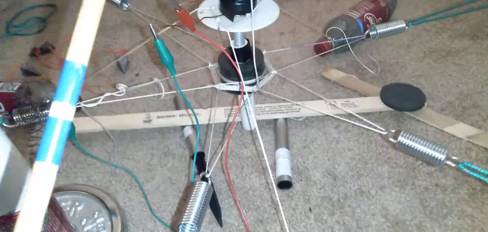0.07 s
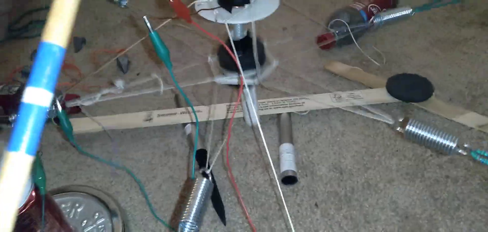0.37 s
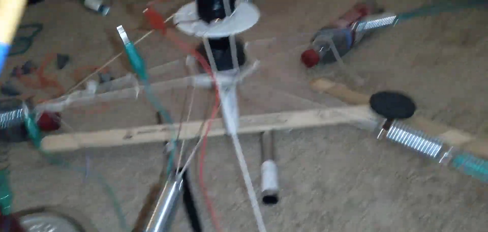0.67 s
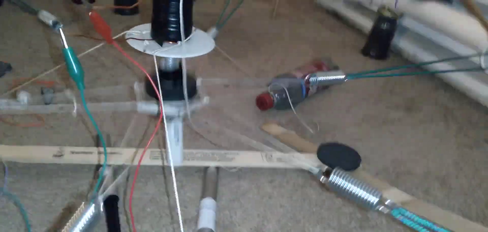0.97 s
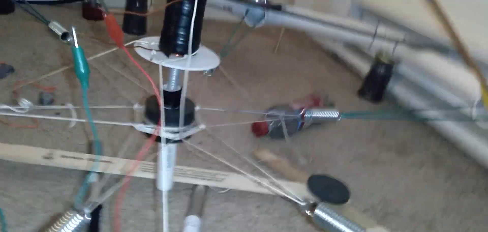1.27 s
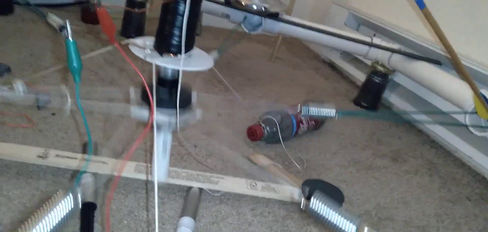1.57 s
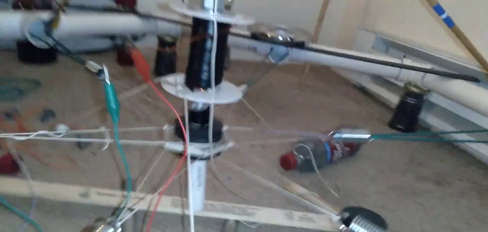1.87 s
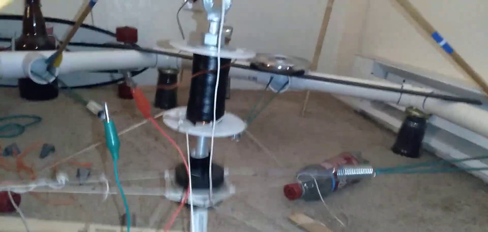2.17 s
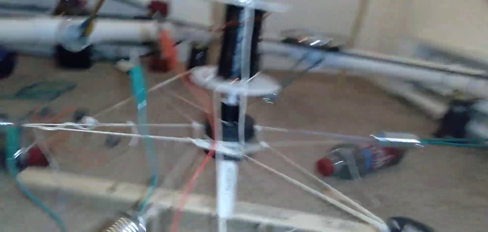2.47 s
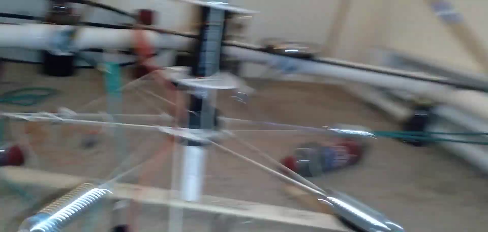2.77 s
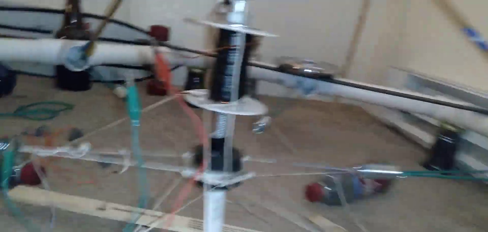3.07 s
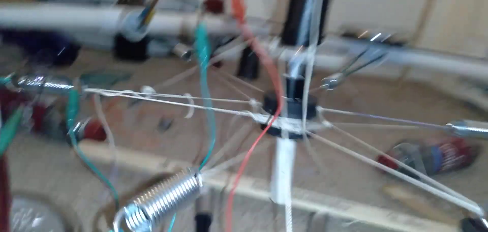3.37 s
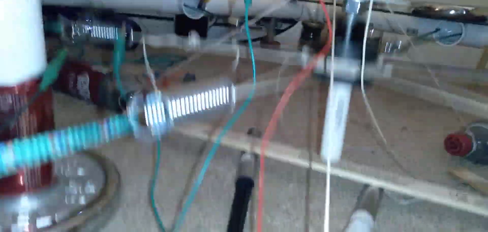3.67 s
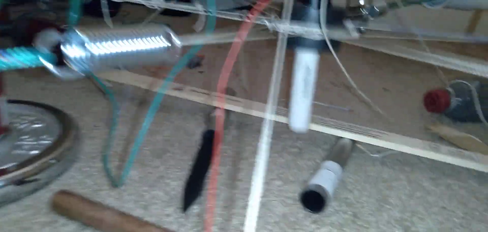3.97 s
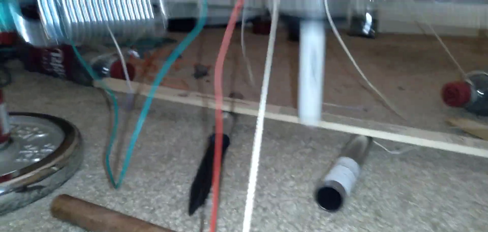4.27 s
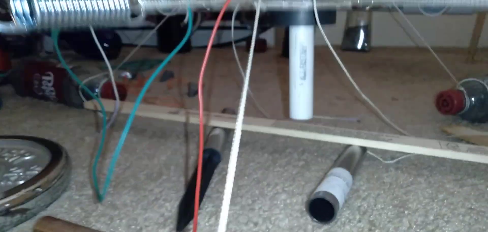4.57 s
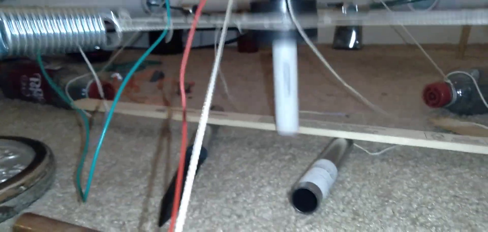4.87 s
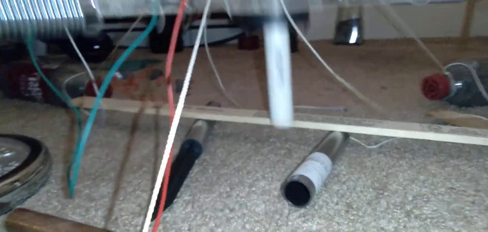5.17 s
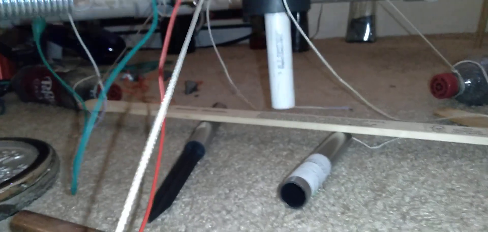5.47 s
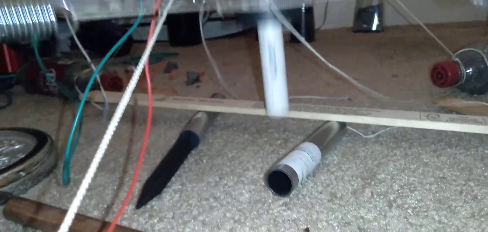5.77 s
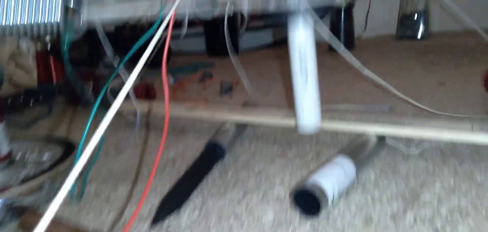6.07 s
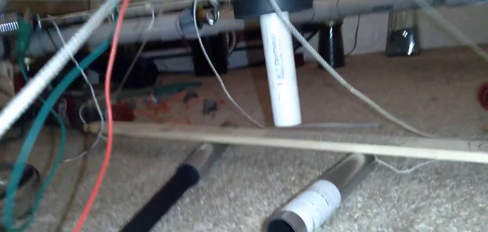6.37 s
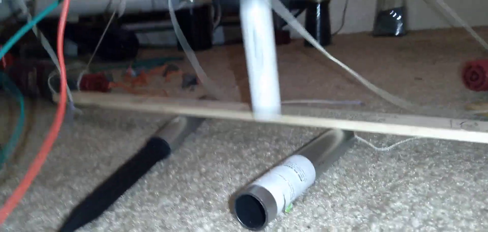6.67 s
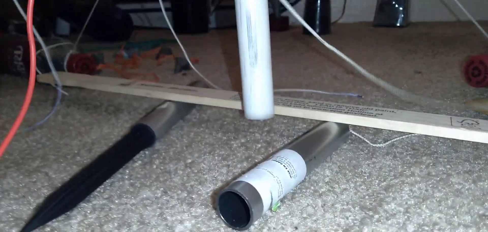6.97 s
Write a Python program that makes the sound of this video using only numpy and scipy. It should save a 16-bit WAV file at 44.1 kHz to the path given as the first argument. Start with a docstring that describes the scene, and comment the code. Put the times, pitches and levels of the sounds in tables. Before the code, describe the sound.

Fast, even metallic rattling of jerked coil springs on a spinning contraption, with wooden clatter, sharp clicks and a faint string twang.

```python
"""After a short silence, a homemade machine starts turning 5.6 times a second on a small room's carpet.
Strings and steel coil springs hold its shaft. Each turn jerks the springs: their coils clash in four
quick bursts while the frame clatters, loose parts knock and a string twangs. In the first four seconds
the strings rub hardest on the shaft and hooks slap the springs loudly. Then the springs sound duller
and the twang stands out, until the loud slaps return near the end."""
import sys
import numpy as np
from scipy import signal
from scipy.fft import rfft, irfft, next_fast_len
from scipy.io import wavfile

SR = 44100
rng = np.random.default_rng(int(sys.argv[2]) if len(sys.argv) > 2 else 0)


def materialize(psi):
    """Save the field psi as 16-bit PCM at rate SR to the path in sys.argv[1].

    A 1-D psi becomes a single channel; in a 2-D psi each row is a channel.
    """
    bounded = np.clip(np.atleast_2d(psi).T, -1, 1)
    quanta = np.round(bounded * 32767).astype(np.int16)
    wavfile.write(sys.argv[1], SR, quanta)


N = 313551
SIZE = 16384  # samples in one short sound; T holds its times and HZ its frequencies
T = np.arange(SIZE) / SR
HZ = np.fft.rfftfreq(SIZE, 1 / SR)
SCENE_T = np.arange(N) / SR


def amp(db):
    """Turn decibels into a gain."""
    return 10 ** (np.asarray(db) / 20)


def unit(x):
    """Scale x to an average power of 1."""
    return x / np.sqrt(np.mean(np.abs(x) ** 2) + 1e-20)


def along(points, hz):
    """Read between (frequency, value) points on an octave scale."""
    freqs, values = np.transpose(points)
    return np.interp(np.log(hz + 1), np.log(freqs), values)


def hump(centre_hz, octaves):
    """A smooth hill of height 1 around one frequency."""
    return np.exp(-.5 * (np.log2((HZ + 1) / centre_hz) / octaves) ** 2)


def add(track, start_s, x):
    """Mix a short sound into the track."""
    i = max(round(start_s * SR), 0)
    track[..., i:i + SIZE] += x[..., :max(N - i, 0)]


def filtered(x, response):
    """Scale each frequency of x by response(hz)."""
    size = next_fast_len(N + SIZE, real=True)
    return irfft(rfft(x, size) * response(np.fft.rfftfreq(size, 1 / SR)), size)[..., :N]


def struck(colour):
    """The response of a struck object with this tone colour: nothing sounds before the blow."""
    cepstrum = irfft(np.log(np.maximum(colour, 1e-6)))
    cepstrum[1:SIZE // 2] *= 2
    cepstrum[SIZE // 2 + 1:] = 0
    return np.exp(rfft(cepstrum))


def wobble(rate):
    """A wandering curve through `rate` random points a second."""
    points = rng.standard_normal(int(N * rate / SR) + 4)
    return np.interp(SCENE_T * rate, np.arange(len(points)), points)


def noise(spectrum, width):
    """Stereo noise with the given tone colour."""
    middle, side = filtered(rng.standard_normal((2, N)), lambda hz: amp(along(spectrum, hz)))
    return unit(np.array([middle + width * side, middle - width * side]))


def taps(delay_s, length_s, scatter_db, count, fade_db=0):
    """A burst of tiny, uneven hits that fades by fade_db along its length."""
    when = length_s * (np.arange(count) + rng.random(count)) / count
    attack = np.minimum(.5 + when / .002, 1)
    sizes = attack * amp(scatter_db * rng.standard_normal(count) - fade_db * when / length_s)
    sizes *= rng.choice([-1, 1], count)
    samples = ((max(delay_s, 0) + when) * SR).astype(int)
    return np.bincount(samples, sizes / np.linalg.norm(sizes), SIZE)[:SIZE]


# How long the room's echo takes to fall 60 dB at fade_speed 1: frequency_hz, fade_s
ROOM_FADE = [(100, 0.93), (600, 0.24), (3000, 0.24), (8000, 0.19), (15000, 0.1)]

def room(wet_db, fade_speed=1, lag_s=.000355, shared_hz=900):
    """Sound reaches the right ear first, then the left, and the walls answer."""
    hz = np.fft.rfftfreq(256, 1 / SR)[:, None]
    t = np.arange(SIZE // 128 + 1) * 128 / SR
    grains = rng.standard_normal((2, len(hz), len(t), 2)) @ [1, 1j]
    fade = amp(-60 * fade_speed * t / along(ROOM_FADE, hz))
    echo = signal.istft(grains * fade)[1] * (1 - np.exp(-T / .00027))
    middle, side = unit(rfft(echo))
    spread = np.pi / 4 * (1 - np.exp(-HZ / shared_hz))  # low notes are alike in both ears
    walls = np.cos(spread) * middle + np.sin(spread) * np.array([side, -side])
    lag = lag_s * (1 + rng.normal(0, .07))  # each blow comes from a slightly different direction
    direct = np.exp(-2j * np.pi * HZ * np.array([[lag], [0]]))
    return (direct + amp(wet_db) * walls) / np.hypot(1, amp(wet_db))


def spin_up(start_s=.382):
    """The running noises rise from silence as the machine gets going."""
    return np.interp(SCENE_T, [start_s, .55, .62], [.1, .2, 1]) * np.clip((SCENE_T - start_s) / .0047, 0, 1)


LEAN_LEFT = amp([[1.3], [-1.3]])
# Tone colour of the frame's rumble: frequency_hz, level_db
RUMBLE_TONE = [(20, -29), (50, -13), (72, -1.5), (105, -4), (150, 4), (200, -8), (270, -1), (420, -8),
               (900, -27.5), (4000, -64)]

def rumble(level_db=-69):
    """The frame rumbles, swelling once with each turn of the shaft."""
    starts = np.array(SHAFT_TURNS)[:, 0]
    edges = np.append(starts, 2 * starts[-1] - starts[-2])
    angle = 2 * np.pi * np.interp(SCENE_T, edges, np.arange(len(edges)))
    swell = amp(level_db - 3.5 * np.cos(angle + .029) + 3.8 * wobble(25))
    return spin_up() * swell * noise(RUMBLE_TONE, width=.45) * LEAN_LEFT


# Tone colours of the strings' scrape and hiss: frequency_hz, level_db
SCRAPE_TONE = [(30, -21), (110, -8), (170, 0), (225, 7), (320, -16), (600, 2.5), (1000, 5), (1500, 6),
               (2200, 8), (3500, 4), (6000, -8.5), (16000, -11.5)]
HISS_TONE = [(1500, -48), (4500, 0), (6500, 0.5), (8200, 8.5), (10000, 5), (12000, 0), (15500, -4.5)]
# Spells when the strings grip the shaft: peak_s, rise_s, fall_s, scrape_db, hiss_db
GRIPS = [(0.79, 0.35, 0.23, -51.5, -47), (1.02, 0.6, .7, -70, -51), (1.89, 0.086, 0.17, -54, -48),
         (2.06, 0.12, 0.098, -77, -42), (2.64, 0.32, 0.71, -52.5, -49.5), (2.9, 0.71, 1.83, -61, -48)]

def rubbing(light_scrape_db=-74.5, light_hiss_db=-65.5, swell_db=21):
    """The strings rub lightly on the shaft, and harder in spells that swell and fade."""
    scrape_gain, hiss_gain = amp(light_scrape_db), amp(light_hiss_db)
    for peak_s, rise_s, fall_s, scrape_db, hiss_db in GRIPS:
        spell = amp(-swell_db * np.maximum((peak_s - SCENE_T) / rise_s, (SCENE_T - peak_s) / fall_s))
        scrape_gain = np.hypot(scrape_gain, amp(scrape_db) * spell)
        hiss_gain = np.hypot(hiss_gain, amp(hiss_db) * spell)
    scrape = scrape_gain * amp(1 + 3 * wobble(150)) * noise(SCRAPE_TONE, width=.88)
    hiss = hiss_gain * amp(wobble(60)) * noise(HISS_TONE, width=1)
    return spin_up() * (scrape + hiss * LEAN_LEFT)


# The twanging string is nearer, and so louder, later on: time_s, level_db
TWANG_LEVELS = [(1.5, -66), (3.6, -62.5), (4.5, -57), (7, -62)]

def twang(pitch_hz=313, peak_s=.052, sharpness=3.5, sag_hz_per_s=160):
    """A tight string swells and dies once a turn; its pitch flutters and sags as the pull lets go."""
    out = np.zeros(N)
    swell = (T / peak_s * np.exp(1 - T / peak_s)) ** sharpness
    for start_s, *_ in SHAFT_TURNS[1:]:
        db = np.interp(start_s, *np.transpose(TWANG_LEVELS)) + 2 * rng.standard_normal()
        flutter = .5 * np.interp(T, np.linspace(0, T[-1], 24), rng.standard_normal(24))
        hz = pitch_hz + rng.normal(0, 4.4) - sag_hz_per_s * (T - peak_s)
        add(out, start_s, amp(db) * swell * np.sin(2 * np.pi * np.cumsum(hz) / SR + flutter))
    return out


# Tone colour of the frame when hit: frequency_hz, level_db
FRAME_TONE = [(40, -34), (130, -3.5), (300, 7.5), (430, -7.5), (800, -4), (1000, -3), (1600, 2), (2400, 2),
              (4500, -21), (9000, -4), (16000, 4)]
# The frame's hollow notes: pitch_hz, width_hz, level_db
HOLLOW_NOTES = [(552, 290, 10.5), (643, 57, 10)]

def frame_colour():
    """The wood and plastic frame answers a blow most strongly at its hollow notes."""
    notes = sum(amp(db) / (1 + (2 * (HZ - hz) / width) ** 2) for hz, width, db in HOLLOW_NOTES)
    return amp(along(FRAME_TONE, HZ)) * (1 + notes)


# How loud the frame's clatter is as time goes on: time_s, pull_db, slack_db
CLATTER_LEVELS = [(.38, -42, -43.5), (.7, -25.5, -29), (1.5, -28.5, -33.5), (2.3, -27.5, -31.5),
                  (3.3, -27, -34), (4, -30.5, -38.5), (4.6, -22.5, -27), (5.3, -23, -31), (6, -26, -27),
                  (7, -20, -27)]

def clatter():
    """The frame clatters as the strings pull tight and again as they go slack."""
    out = np.zeros((2, N))
    colour = frame_colour() * amp(4 * hump(660, .27))
    when, pull_db, slack_db = np.transpose(CLATTER_LEVELS)
    for start_s, *_ in SHAFT_TURNS:
        pull = amp(np.interp(start_s, when, pull_db)) * taps(.001, .042, scatter_db=3, count=4)
        slack = amp(np.interp(start_s, when, slack_db)) * taps(.082, .036, scatter_db=3, count=3)
        accent_hz = 1000 * 2 ** rng.normal(0, .6)
        body = struck(unit(colour * amp(6 * hump(accent_hz, .6))))
        space = room(wet_db=-7, fade_speed=1.5, lag_s=.0002)
        add(out, start_s, irfft(rfft(pull + slack) * body * space))
    return out


# The loudest knocks of loose parts: start_s, level_db, pitch_hz
LOUD_KNOCKS = [(0.9405, -40.5, 900), (1.0935, -26, 2480), (1.8377, -39, 660), (1.9919, -37.5, 990),
               (2.0905, -34.5, 640), (2.1724, -33, 2020), (2.433, -36.5, 1560), (3.2394, -37.5, 1720),
               (3.4352, -36, 1500), (3.635, -40, 1600), (3.677, -40.5, 1340), (5.735, -41, 1100),
               (6.0905, -39.5, 830)]

def knocks(gain_db=3, tip_s=.025, tip_db=-19, drop_s=.098, drop_db=-18.5, rocking_hz=920):
    """Loose parts knock on the frame; each pull also tips one, which then drops back."""
    out, colour = np.zeros((2, N)), frame_colour()
    when, pull_db, slack_db = np.transpose(CLATTER_LEVELS)
    rocking = []
    for delay_s, force_db in [(tip_s, pull_db + tip_db), (drop_s, slack_db + drop_db)]:
        for turn_s, *_ in SHAFT_TURNS:
            late_s, extra_db, octaves = rng.normal(0, [.009, 2.5, .39])
            db = np.interp(turn_s, when, force_db) + extra_db
            rocking.append((turn_s + delay_s + late_s, db, rocking_hz * 2 ** octaves))
    for start_s, db, hz in LOUD_KNOCKS + rocking:
        focus_db = 20 * (hump(hz, min(1100 / hz, 1.5)) - 1)
        body = struck(colour * amp(focus_db))
        knock = irfft(body * room(wet_db=-4.5, fade_speed=1.84, lag_s=.00015))
        add(out, start_s, amp(db + gain_db) * knock / np.abs(knock).max())
    return out


# Tone colour of the steel springs: frequency_hz, level_db
STEEL_TONE = [(1000, -10.5), (1900, -15), (2600, -17.5), (3200, -6), (4000, -2.5), (4600, -13), (5600, -8),
              (6500, -3), (8300, -4.5), (9900, 2), (12000, -2.5), (15500, -6.5)]
# The springs' own notes: pitch_hz, width_hz, level_db
COIL_NOTES = [(2110, 110, -3), (2985, 27, 5.5), (3700, 47, -39.5), (4180, 130, -17), (5300, 340, -1),
              (5970, 14, -41), (6250, 190, 1.5), (7680, 190, -2), (8450, 65, -31), (9510, 290, 7.5),
              (10260, 210, 7.5), (11000, 160, -42.5)]

def coil_colour(stretch=1, notes_db=-1, blur_hz=35):
    """Changing tension shifts and blurs the springs' notes; thin wire gives off no bass."""
    notes = sum(amp(db) ** 2 / (1 + (2 * (HZ - hz * stretch) / (width + blur_hz)) ** 2)
                for hz, width, db in COIL_NOTES)
    bass_cut = 1 / (1 + (1500 / (HZ + 1)) ** 4)
    power = amp(along(STEEL_TONE, HZ)) ** 2 + amp(notes_db) ** 2 * notes * bass_cut
    return unit(bass_cut * np.sqrt(power))


def coil_smear(spread_s):
    """Along a coil, high notes run ahead of low ones and smear each hit a little."""
    return np.exp(-2j * np.pi * spread_s * HZ * (1 - HZ / SR))


# The high treble is louder on the right: frequency_hz, left_minus_right_db
EAR_BALANCE = [(700, 4), (2000, 1.5), (3200, 0), (5500, 3), (7200, 7), (8400, 6), (9900, -11), (11500, -7),
               (13000, -4), (15500, 1)]

def balance(pan_db):
    """Share each frequency between left and right, keeping the total power."""
    gains = amp(np.outer([.5, -.5], along(EAR_BALANCE, HZ) + pan_db))
    return gains / np.sqrt(np.mean(gains ** 2, axis=0))


# The hardest slaps of a hook on its spring: start_s, level_db
HARD_SLAPS = [(1.0939, -26), (1.294, -22), (1.5209, -17.5), (1.699, -19.5), (1.812, -14), (2.0104, -13.5),
              (2.3472, -27), (2.8806, -17.5), (3.238, -22), (3.414, -24), (3.6154, -29), (3.6552, -21.5),
              (6.4377, -19.5), (6.6169, -14), (6.974, -17.5)]

def hook_slaps(gain_db=13, share_of_turns=.58, above_jerk_db=4, within_s=.086):
    """A hook slaps its spring with a bright click; lighter slaps fall at random as the springs shake."""
    out = np.zeros((2, N))
    brighten = amp(along([(3000, -4), (9000, 5), (13000, 4.5)], HZ))
    body = struck(unit(coil_colour() * brighten))
    light_slaps = []
    for turn_s, jerk_db, _ in SHAFT_TURNS:
        chance, late = rng.random(2)
        if chance < share_of_turns:
            light_slaps.append((turn_s + within_s * late, jerk_db + above_jerk_db))
    for start_s, db in HARD_SLAPS + light_slaps:
        blow = rfft(taps(0, .0012, scatter_db=2, count=5)) * coil_smear(.0015)
        click = irfft(blow * body * room(wet_db=-10) * balance(pan_db=-16))
        add(out, start_s, amp(db + gain_db) * click)
    return out


# Long-lasting notes of the steel: pitch_hz, level_db, fade_s (time to fall 60 dB)
RING_NOTES = [(2724, -56, .7), (3030, -59, .45), (4856, -61, .5), (7480, -60, .3)]

def steel_ring():
    """Shaken steel keeps ringing on a few pure notes."""
    return sum(amp(db - 60 * T / fade_s) * np.sin(2 * np.pi * hz * T + rng.uniform(0, 2 * np.pi))
               for hz, db, fade_s in RING_NOTES)


# Each turn of the shaft jerks the springs: start_s, jerk_db, rebound_db (added to jerk_db)
SHAFT_TURNS = [(0.384, -54, 12.5), (0.5618, -34, 0), (0.7393, -30.5, 0.5), (0.916, -28.5, -1.5),
               (1.091, -32, 1.5), (1.2682, -31, 1.5), (1.4475, -28, -3), (1.6242, -30, -0.5),
               (1.804, -27, -2.5), (1.981, -27, -3), (2.1591, -27.5, -4), (2.337, -28, -10),
               (2.5166, -28.5, -9), (2.695, -28, -2.5), (2.872, -28, -4), (3.0491, -28, -3),
               (3.228, -26, -3), (3.409, -27.5, -3.5), (3.5846, -24, -9), (3.761, -28, -6),
               (3.9397, -32, -8), (4.1195, -34, -3.5), (4.2959, -33.5, -1.5), (4.474, -29.5, -5),
               (4.6514, -30, -3.5), (4.829, -32, -1), (5.0072, -33, -2.5), (5.1869, -32, -1.5),
               (5.3643, -30, -8), (5.546, -31, -5.5), (5.721, -30.5, -7), (5.897, -31.5, -5.5),
               (6.077, -31.5, -4), (6.2544, -33, 0), (6.4347, -30, -6.5), (6.61, -30.5, -1.5),
               (6.7865, -29, -4), (6.9655, -31, 1.5)]
# The coils meet again three times after a jerk: delay_s, length_s, level_db
COIL_REBOUNDS = [(0.0253, .012, 0), (.044, .017, -5.5), (.067, .011, -3.5)]
# How the springs sound to a moving listener: time_s, brightness_db, left_minus_right_db
SPRING_VIEW = [(.5, 3, -1.5), (1.1, 2, -2), (1.8, 8.5, -2.5), (2.5, 8, -5), (3.1, 10.5, -5.5),
               (3.75, 7, -5.5), (3.95, -2, -6), (4.6, 1, -5), (6.2, 0.5, -6), (6.9, 4.5, -8.5)]
# A small and a large spring each sing out when the listener is near: time_s, small_db, large_db
SPRING_ZING = [(.4, 6.5, -11.5), (1, 11, -1.5), (1.6, 4, -1.5), (2.199, -3.5, -1), (3, -2.5, 1.5),
               (5, 3, 1), (7, 2.5, -2)]

def springs(gain_db=29, jerk_s=.012, chatter_db=-4, small_hz=7700, large_hz=2980):
    """Each jerk makes the coils clash and rebound three times, hard and bright, over a darker chatter."""
    out = np.zeros((2, N))
    treble = np.clip(np.log2((HZ + 1) / 5000), 0, 1)
    view_s, brightness, pan = np.transpose(SPRING_VIEW)
    zing_s, small_db, large_db = np.transpose(SPRING_ZING)
    for start_s, jerk_db, rebound_db in SHAFT_TURNS:
        bright_db, pan_db = np.interp(start_s, view_s, brightness), np.interp(start_s, view_s, pan)
        bursts = [(.00018, jerk_s, 0)]
        bursts += [(delay, length, db + rebound_db + rng.normal(0, 2.5))
                   for delay, length, db in COIL_REBOUNDS]
        clashes = sum(amp(jerk_db + db) * taps(delay, length, scatter_db=3.5, count=12, fade_db=6.5)
                      for delay, length, db in bursts)
        shake_db = jerk_db + .5 * rebound_db - bright_db / 3
        chatter = amp(shake_db + chatter_db) * taps(0, .08, scatter_db=2, count=120)
        # the tension and the places where the coils meet change from turn to turn
        stretch = 1 + rng.normal(0, .005)
        places_db = np.interp(HZ, np.linspace(0, SR / 2, 60), rng.standard_normal(60))
        zing_db = np.interp(start_s, zing_s, small_db) * hump(small_hz, .22)
        zing_db += np.interp(start_s, zing_s, large_db) * hump(large_hz, .21)
        colour = coil_colour(stretch) * amp((bright_db - 10) * treble + zing_db + places_db)
        bright_body = struck(unit(colour * amp(5 * treble)))
        dark_body = struck(unit(colour * amp(-8 * treble)))
        hard = rfft(clashes) * coil_smear(.0014) * bright_body * room(wet_db=-1.5)
        soft = rfft(chatter) * dark_body * room(wet_db=-2)
        rattle = irfft((hard + soft) * balance(pan_db))
        ring = amp(shake_db - bright_db / 2) * steel_ring()
        add(out, start_s, amp(gain_db) * (rattle + ring))
    return out


def scene():
    """All parts of the machine together."""
    return springs() + hook_slaps() + knocks() + clatter() + twang() + rumble() + rubbing()


def record(dry):
    """Cut away the very highest treble."""
    top_hz = 15850
    return filtered(dry, lambda hz: np.clip((top_hz - hz) / 200 + .5, 0, 1))


dry = scene()
out = record(dry)
materialize(out)
```